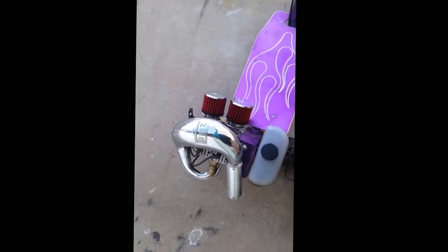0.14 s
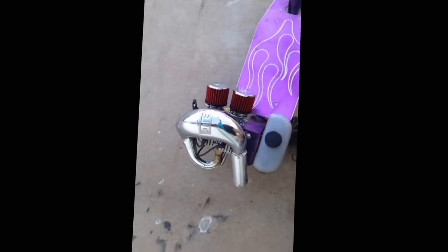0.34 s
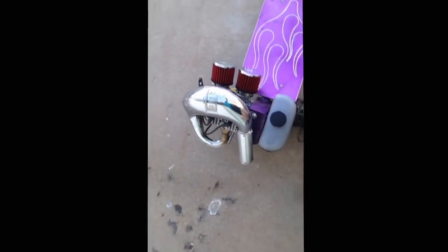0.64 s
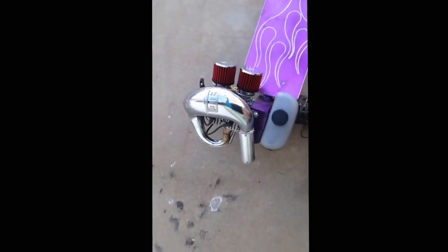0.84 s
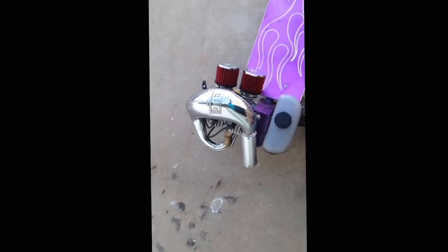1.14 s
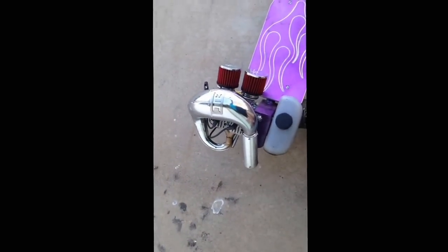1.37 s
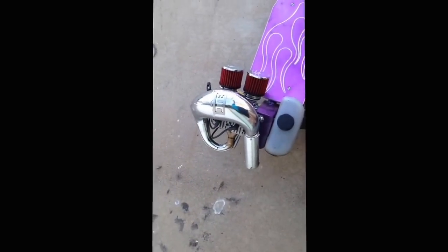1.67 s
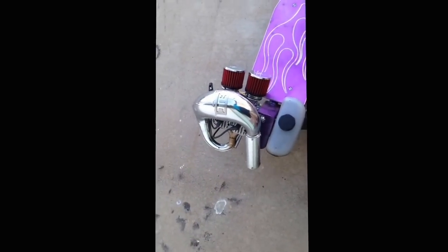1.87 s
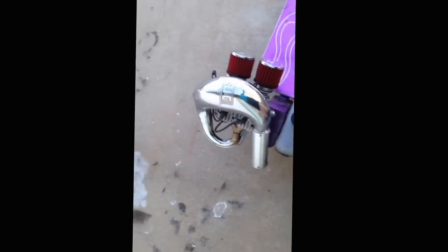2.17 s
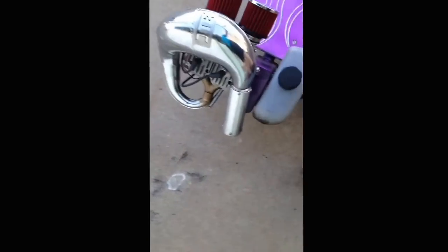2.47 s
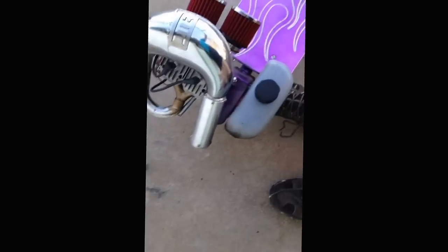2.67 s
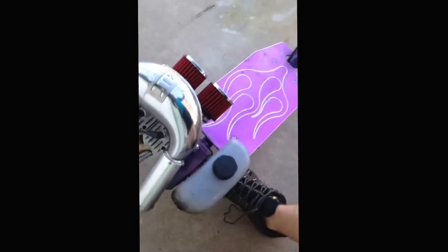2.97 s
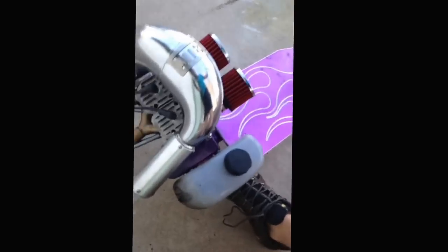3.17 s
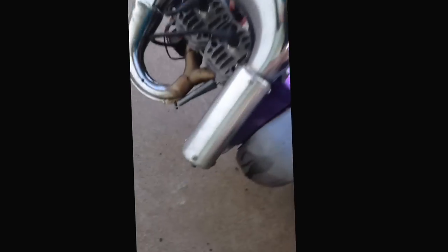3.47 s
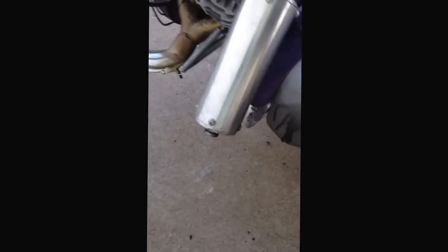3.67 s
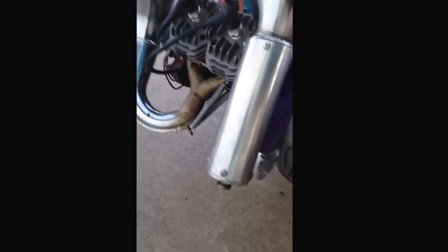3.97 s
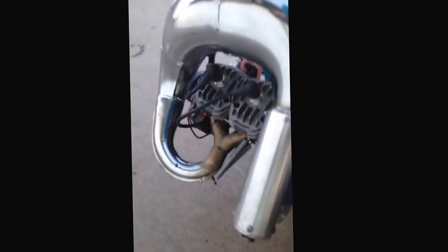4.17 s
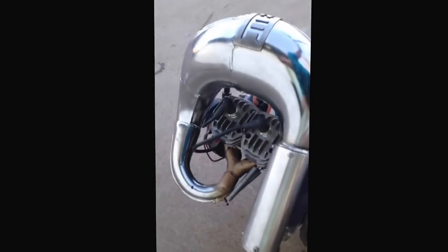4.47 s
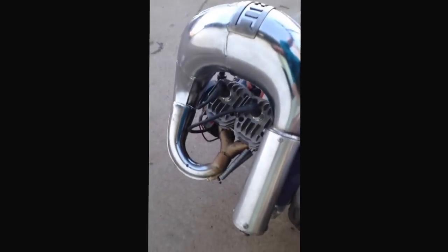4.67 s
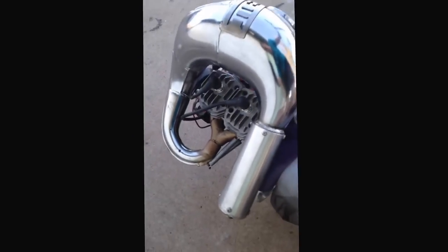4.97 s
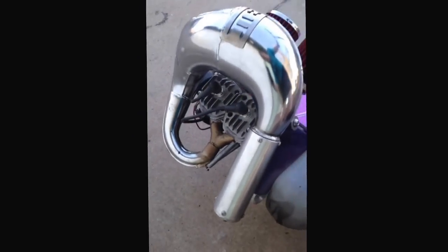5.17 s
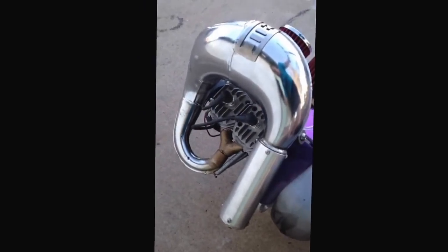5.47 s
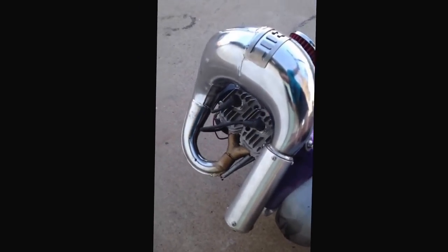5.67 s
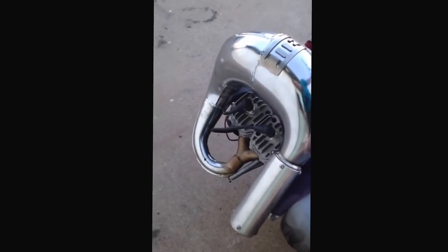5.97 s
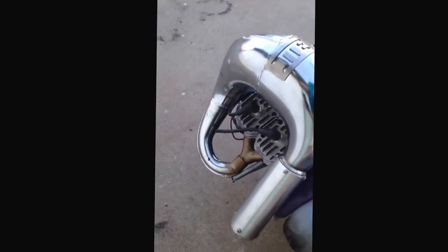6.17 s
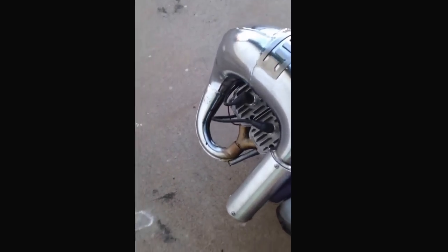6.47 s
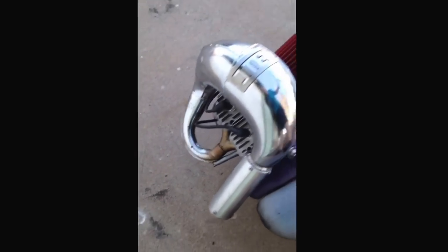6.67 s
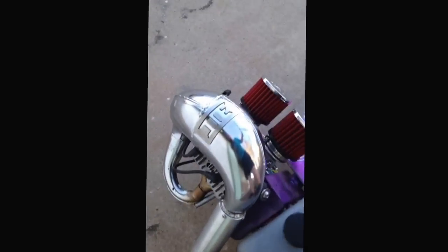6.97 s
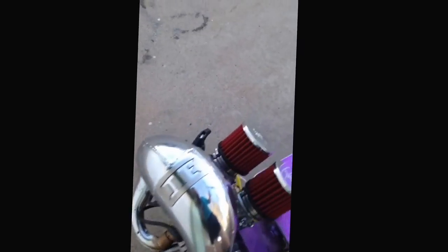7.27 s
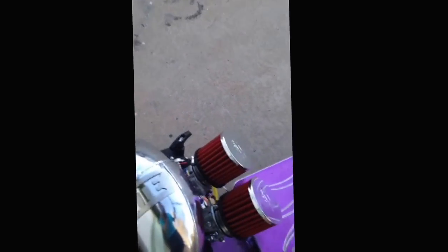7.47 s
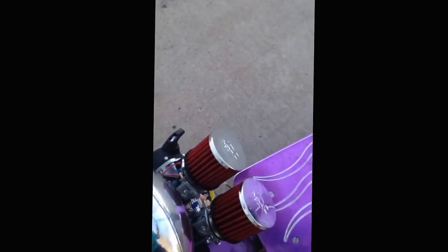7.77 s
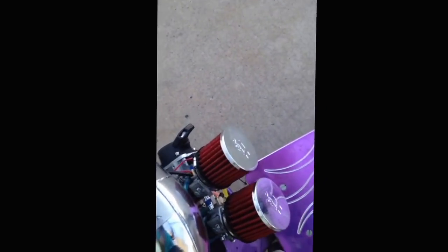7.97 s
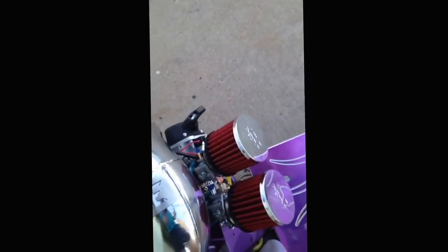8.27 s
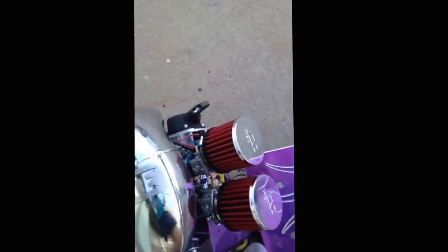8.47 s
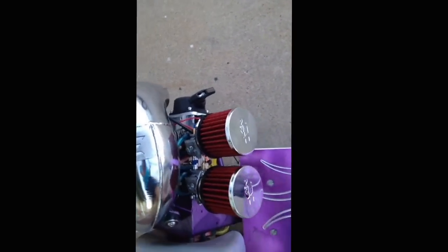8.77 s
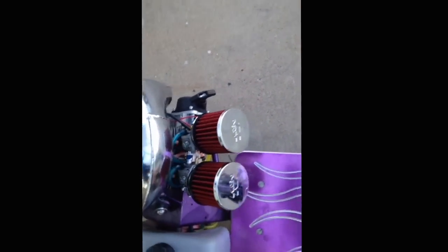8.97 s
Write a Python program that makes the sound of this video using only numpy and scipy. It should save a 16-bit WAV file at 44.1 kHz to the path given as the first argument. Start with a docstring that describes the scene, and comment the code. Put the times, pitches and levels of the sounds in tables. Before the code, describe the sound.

Five quick throttle bursts from a tiny twin-cylinder two-stroke give way to an uneven, popping, clattering idle heard closer and closer, with faint wind.

```python
"""A small two-cylinder two-stroke engine first coasts down from an earlier throttle blip. Five blips follow in
the next three and a half seconds, each a fast run-up and a slower fall. Then it idles lumpily while the
microphone moves in close. Each firing hums in the tuned pipe, barks in the intakes and rattles the casing and
fins; at idle there are added pops every other turn. All of these are pulses and noise sent through resonances.
Filtered noise makes a little wind throughout, and the one microphone clips softly on the loudest peaks."""
import sys
import numpy as np
from scipy.fft import rfft, irfft, next_fast_len
from scipy.io import wavfile
from scipy.ndimage import uniform_filter1d, map_coordinates

SR = 44100
rng = np.random.default_rng(int(sys.argv[2]) if len(sys.argv) > 2 else 0)


def to_wav(s):
    """Save 16-bit WAV."""
    ch = np.atleast_2d(s).T  # columns
    pcm = np.round(np.clip(ch, -1, 1) * 32767)  # PCM
    wavfile.write(sys.argv[1], SR, pcm.astype(np.int16))


N = 402191  # length in samples


def amp(db):
    """Decibels turned into a plain multiplying factor."""
    return 10 ** (np.asarray(db) / 20)


def seconds():
    """The time of every sample, in s."""
    return np.arange(N) / SR


def curves(rows):
    """One value per sample for each column after the time."""
    times, *columns = np.transpose(rows)
    return [np.interp(seconds(), times, column) for column in columns]


def ramp(x, start, end):
    """A straight climb: 0 up to start, 1 from end onwards."""
    return np.clip((x - start) / (end - start), 0, 1)


def wobble(rate):
    """A smooth random curve with the given number of random points a second."""
    points = rng.standard_normal(int(N * rate / SR) + 4)
    return map_coordinates(points, [np.arange(N) * rate / SR])


def even(x, span_s=0.055):
    """x held at a running rms of about 1, so that a loudness curve alone sets its level."""
    size = int(span_s * SR)
    power = uniform_filter1d(uniform_filter1d(x * x, size), size)
    return x / np.sqrt(np.abs(power) + 1e-12)


def filtered(x, response):
    """x with every frequency scaled and shifted in phase by a complex response."""
    m = next_fast_len(N + SR // 4)  # spare room for the tails
    return irfft(rfft(x, m) * response(np.fft.rfftfreq(m, 1 / SR)), m)[..., :N]


def modes(table, turn=-1):
    """A sum of resonances, each ringing after it is struck; turn -1 keeps the valleys between them filled."""
    def response(f):
        total = 0
        for k, (center, width, db) in enumerate(table):
            resonance = 1j * f * width / (center * center - f * f + 1j * f * width)
            total = total + turn ** k * amp(db) * resonance
        return total
    return response


def ringing(spectrum, table):
    """A broad colour with narrow resonances standing on it."""
    hz, db = np.transpose(spectrum)

    def response(f):
        broad = amp(np.interp(np.log(f + 1), np.log(hz), db))
        return broad * (1 + modes(table, turn=1)(f))
    return response


def steepened(table, corner_hz, order):
    """Resonances with the bass below the corner taken away."""
    return lambda f: modes(table)(f) * (1j * f / (corner_hz + 1j * f)) ** order


def between(x, first, second, share):
    """x through two bodies, cross-faded as the microphone moves (share 0 is the first)."""
    share = np.clip(share, 0, 1)
    one, two = filtered(x, lambda f: np.array([first(f), second(f)]))
    return even((1 - share) * even(one) + share * even(two))


def dying(x, t_s):
    """Every pulse of x grows an exponential tail."""
    return filtered(x, lambda f: 1 / (1 + 2j * np.pi * f * t_s))


def breathy(train, puff_s, steady, share):
    """Pulses mixed with noise that puffs after each pulse, over a steady part; share is that of the noise."""
    gate = even(dying(train, puff_s)) + steady
    share = np.clip(share, 0, 1)
    noise = even(gate * rng.standard_normal(N))
    return np.sqrt(1 - share) * even(train) + np.sqrt(share) * noise


def strokes(speed):
    """The running count of firings, two a turn."""
    return 2 * np.cumsum(speed) / SR


def pulses(angle, size, jitter_s):
    """One pulse of the given size near each whole number of the angle, placed between samples."""
    at = np.interp(np.arange(len(size)) + 1, angle, np.arange(N))
    at = np.clip(at + jitter_s * SR * rng.standard_normal(len(size)), 0, N - 2)
    whole, part = at.astype(int), at % 1
    return np.bincount(whole, size * (1 - part), N) + np.bincount(whole + 1, size * part, N)


def firings(speed, weak, lead, scatter_db, jitter_s):
    """Two pulses a turn, lead strokes ahead of the exhaust blow; the second cylinder is weaker."""
    angle = strokes(speed) + lead
    count = np.arange(1, int(angle[-1]))
    weak = np.clip(np.interp(count, angle, weak), 0, 1)
    size = (1 - weak * (count % 2)) * amp(scatter_db * rng.standard_normal(len(count)))
    return pulses(angle, size, jitter_s)


# Wind rumble before lumps, gusts and a 4 dB cut: (t/s, level/dB)
WIND_RUMBLE = [(0, -53), (.3, -39), (1.5, -36), (2.2, -42.5), (3.4, -37), (4.1, -38), (5.5, -36), (7, -37),
               (8.2, -36.5), (9.12, -42)]
# Short gusts: (t/s, level/dB above the rumble)
WIND_GUSTS = [(2.62, 17), (7.39, 13), (8.26, 17)]


def wind(speed):
    """Air buffets the microphone: low noise in slow lumps and gusts, thinning out as the engine revs up."""
    def low(f):
        return modes([(68, 50, 0)])(f) * f * f / (f * f + 3000) / (1 + (f / 110) ** 4)
    rumble = filtered(rng.standard_normal(N), low)
    gust_width_s, lump_db, lumps_per_s, thins_db = .035, 3.5, 7, -34
    t = seconds()
    gust_db = sum(db * np.exp(-((t - s) / gust_width_s) ** 2) for s, db in WIND_GUSTS)
    level_db = curves(WIND_RUMBLE)[0] - 4 + gust_db + lump_db * wobble(lumps_per_s)
    level_db = level_db + thins_db * ramp(speed, 68, 220)  # turns per second
    return amp(level_db) * rumble / np.std(rumble)


# Idle speed before random hunting: (t/s, f/Hz as turns per second)
IDLE_SPEED = [(0, 54.1), (.45, 54.92), (2.14, 57.37), (2.27, 61.8), (2.5, 52.43), (2.6, 52.32), (3.2, 62.7),
              (3.4, 58.83), (4.06, 67.01), (4.26, 54.2), (4.6, 57.8), (4.72, 62.94), (5.05, 65.54),
              (5.41, 67.35), (5.77, 62.9), (6.21, 65.97), (6.49, 62.54), (6.77, 65.73), (7.15, 64),
              (7.28, 68.92), (7.69, 64.14), (8.0, 64.94), (8.27, 59.26), (8.66, 56.08), (9.0, 56.96),
              (9.12, 59.7)]
# Throttle blips: (opens t/s, opening time/s, shuts t/s, middle of the run-up t/s, run-up time/s,
# speed starts to fall t/s, speed aimed at f/Hz before the creep, coasting loss per s;
# changes while pulling: pipe level/dB, intake level/dB, casing level/dB, fins level/dB;
# changes while coasting: gas level/dB, metal level/dB)
THROTTLE_BLIPS = [(.44, .06, .575, .557, .0283, .603, 287, 3.17, -2, 0, 0, 0, 0, 0),
                  (.912, .028, 1.072, .973, .0183, 1.093, 274, 3.33, 0, 0, 0, 0, 0, 0),
                  (1.462, .028, 1.618, 1.529, .0172, 1.632, 277, 3.14, 0, 0, 0, 0, 0, 0),
                  (2.592, .04, 2.748, 2.698, .0238, 2.755, 262, 3.05, 1, 2, -4, -1, 0, 0),
                  (3.368, .028, 3.538, 3.463, .0248, 3.544, 284, 3.13, -3, 3, -9, -2, -1, 1.5)]
START_HZ, START_LOSS = 149, 3.05  # still coasting down from an earlier blip (turns per second, loss per s)
HUNT_HZ, HUNTS_PER_S = 1.2, 12  # random wander of the idle: size, random points a second
CREEP_HZ_PER_S = 180  # near the top the speed still creeps up


def shaft():
    """Crankshaft speed in turns per second: an S-shaped run-up at each blip, then an exponential fall to idle."""
    t = seconds()
    idle = curves(IDLE_SPEED)[0] + HUNT_HZ * wobble(HUNTS_PER_S)
    speed = np.maximum(idle, START_HZ * np.exp(-START_LOSS * t))
    for _, _, _, middle, rise_s, falls, aim_hz, loss, *_ in THROTTLE_BLIPS:
        climb = (1 + np.tanh((t - middle) / rise_s / 2)) / 2
        target = aim_hz + CREEP_HZ_PER_S * (t - middle)
        rising = speed + (target - speed) * climb
        falling = rising[int(falls * SR)] * np.exp(-loss * np.abs(t - falls))
        speed = np.where(t < falls, rising, np.maximum(idle, falling))
    return uniform_filter1d(speed, SR // 60)


# Throttle open, before each blip's own changes: (speed f/Hz as turns per second, pipe level/dB,
# intake level/dB, casing level/dB, fins level/dB, weakness of the second cylinder in the pipe 0-1,
# the same in the intakes 0-1, pressure swell relative to the blow's own first tone)
PULLING_LEVELS = [(60, -18, -14.5, -23, -28, .3, 0, 1.9), (90, -12.5, -11, -22.5, -23.5, .15, 0, 1.4),
                  (125, -15, -9.5, -17.5, -23.5, 0.3, 0.1, 4),
                  (185, -21.5, -19, -12.5, -15, 0.64, 0.24, 0.95),
                  (229, -11, -14, -11.5, -15, 0.4, .4, 3.9), (268, -8, -20.5, -20, -11.5, 0, 0, 1.4),
                  (294, -14, -11, -12, -16.5, 0.5, 0, 1.8)]
# Throttle shut: same columns; the rattle steps down near 160 Hz, probably as the clutch lets go
COASTING_LEVELS = [(90, -32.5, -36, -34.5, -29.5, 0.62, 0.3, 0.23),
                   (113.5, -34, -38, -34, -28, 0.55, 0.45, 0.27),
                   (133, -30.5, -33.5, -33, -23.5, 1, 0.25, 2.1), (164, -34, -28, -28.5, -23, 1, 0.27, 2.9),
                   (181.4, -38, -34.5, -23.5, -12.5, 0.76, 1, 0.89),
                   (171, -43.5, -28.5, -19.5, -15, .55, 0.96, 1.3),
                   (203.4, -18.5, -32, -29, -14.5, .55, 0.53, 1.3),
                   (221, -28, -26, -22.5, -13.5, 0.38, 0.29, 2.3),
                   (269, -22.5, -39, -24, -15, 0.82, 0.99, 1.3),
                   (282, -23.5, -29.5, -19.5, -10.5, 1, .3, 1.3)]
# Idling, louder as the microphone comes near: (t/s, then the same columns after the speed)
IDLING_LEVELS = [(0, -31, -35.5, -36.5, -30.5, 0.97, .25, 0.11),
                 (2.1, -32.5, -38.5, -37, -30.5, 0.67, 0.49, 0.11),
                 (2.58, -32, -36.5, -35.5, -28, 0.45, .55, 0.43),
                 (3.15, -32.5, -34.5, -38, -28, 0.73, 0.94, 0.2),
                 (3.36, -30.5, -30.5, -35, -25.5, 0.68, .79, 0.46),
                 (4.0, -27.5, -31.5, -32.5, -25.5, 0.55, 0.66, 0.18),
                 (4.35, -31, -31.3, -33, -25.5, .6, 0.47, 0.34),
                 (4.72, -26.5, -27.3, -28.5, -21, 0.3, 0.51, 0.26),
                 (5.02, -25, -27.5, -28.5, -20, 0.75, 0.89, 0.16),
                 (5.42, -25.5, -27.5, -27, -20, .5, 0.7, .3),
                 (6.0, -24, -25.5, -26, -19.7, 0.77, 0.74, 0.25),
                 (6.95, -22.5, -27, -25, -20, 0.53, 0.54, .28),
                 (7.84, -20.5, -27, -21.5, -19, .5, .46, .26),
                 (8.16, -21, -26, -23, -18.5, 0.71, 0.27, 0.24),
                 (8.49, -25.5, -27.5, -20.5, -19.1, 0.49, 0.5, .27),
                 (9.12, -25, -27.5, -22, -21, 0.55, 0.29, 0.16)]
CLOSING_S = .032  # throttle travel back
SETTLED_HZ, UNSETTLED_HZ = 68, 103  # coasting blends into idle between these speeds
RAGGED_DB, RAGGED_PER_S = 2.5, 30  # uneven levels on the overrun: depth, random points a second
# turbulence: strongest as the throttle snaps open at low speed, least once past SMOOTHS_HZ
ROUGH_SHUT, ROUGH_OPEN, ROUGH_SNAP, SMOOTHS_HZ = .125, .085, .22, 170


def at_speed(rows, speed):
    """Each column after the first, read off at the engine speed."""
    hz, *columns = np.transpose(rows)
    return np.array([np.interp(speed, hz, column) for column in columns])


def running(speed):
    """Throttle and speed set the four part levels, cylinder weakness, swell, turbulence and share of revving."""
    t = seconds()
    throttle, extra_db = np.zeros(N), np.zeros((4, N))
    for opens, opening_s, shuts, *_, pipe_db, intake_db, casing_db, fins_db, gas_db, metal_db in THROTTLE_BLIPS:
        opened = ramp(t, opens, opens + opening_s)
        opened = opened - ramp(t, shuts - CLOSING_S / 2, shuts + CLOSING_S / 2)
        throttle = throttle + opened
        pulling_db = np.array([[pipe_db], [intake_db], [casing_db], [fins_db]])
        coasting_db = np.array([[gas_db], [gas_db], [metal_db], [metal_db]])
        after = t > opens  # holds until the next blip replaces it
        extra_db[:, after] = (opened * pulling_db + (1 - opened) * coasting_db)[:, after]
    revving = np.maximum(throttle, ramp(speed, SETTLED_HZ, UNSETTLED_HZ))
    coasting = revving - throttle
    state = throttle * at_speed(PULLING_LEVELS, speed) + coasting * at_speed(COASTING_LEVELS, speed)
    state = state + (1 - revving) * np.array(curves(IDLING_LEVELS))
    state[:4] += revving * extra_db
    # pipe, intake and casing waver separately
    state[:3] += coasting * RAGGED_DB * np.array([wobble(RAGGED_PER_S) for part in range(3)])
    pulling_rough = ROUGH_SNAP + (ROUGH_OPEN - ROUGH_SNAP) * ramp(speed, 83, SMOOTHS_HZ)
    rough = ROUGH_SHUT + throttle * (pulling_rough - ROUGH_SHUT)
    return state, rough, revving


# At idle the charge lights only every other turn, in spells; level before the cut while revving:
# (start t/s, end t/s, pop level/dB)
POP_SPELLS = [(.19, .46, -41), (2.065, 2.337, -36), (3.117, 3.38, -33.5), (3.954, 4.178, -28.5),
              (4.657, 5.82, -25.5), (6.043, 7.007, -25.5), (7.165, 8.244, -24.5), (8.24, 9.199, -35)]
SPELL_EDGE_S, BETWEEN_DB = .068, -37.5  # fade time of a spell, pop level between spells


def spells(revving):
    """Loudness in dB of the every-other-turn pops, 14 dB lower while revving."""
    t = seconds()
    half = SPELL_EDGE_S / 2
    lift_db = 0
    for start, end, db in POP_SPELLS:
        lit = ramp(t, start - half, start + half) - ramp(t, end - half, end + half)
        lift_db = lift_db + (db - BETWEEN_DB) * lit
    return BETWEEN_DB + lift_db - 14 * revving


def popping(speed, lead):
    """One pulse of slightly random size every two turns, lead strokes early."""
    angle = (strokes(speed) + lead) / 4  # four strokes make two turns
    size = amp(1.3 * rng.standard_normal(int(angle[-1]) - 1))
    return pulses(angle, size, jitter_s=.0004)


# Where the microphone is: (t/s, share of the upper intake tone 0-1, share of the intake side 0-1)
MIC_PLACE = [(0, 0.24, 0.5), (.55, 0.31, 0.64), (1, 0.51, 0.61), (1.55, 0.51, 0.52), (2, 0.23, 0.45),
             (2.55, 0.21, 0.48), (2.63, 0.85, 0.84), (3, 0.45, 0.32), (3.4, 0.72, 0.48), (3.9, 0.6, 0.24),
             (4.3, 0.43, 0.28), (5, 0.57, 0.09), (6, 0.46, 0.14), (7, 0.13, 0.03), (8.1, 0.25, 0.18),
             (8.4, .2, 0.82), (9.12, 0.1, 0.47)]


def mic_place():
    """The share of the upper intake tone and the share of the intake side, sample by sample."""
    return curves(MIC_PLACE)


# The intake's cough: (f/Hz, width f/Hz, relative level/dB)
COUGH_MODES = [(920, 340, 0), (1800, 170, -7)]


def coughing(speed, pop_db):
    """The intake coughs 1.4 strokes after a pop, as loud as the pop times the share of the upper tone."""
    upper = np.clip(mic_place()[0], 0, 1)
    puffs = popping(speed, lead=2.6)
    return amp(pop_db) * upper * even(filtered(puffs, modes(COUGH_MODES)))


# Resonances rung by a pop: (f/Hz, width f/Hz, relative level/dB)
CHAMBER_MODES = [(179, 120, 3), (286.4, 72, 10), (874, 29, -7), (1050, 180, -53), (1660, 130, -22.5)]
# A pop heard from the intake side: same columns
CHAMBER_MODES_FAR = [(272, 87, -10), (454, 1800, 7), (714, 25, -10)]


def chamber(pops, pop_db):
    """Each pop of burning charge rings the chamber's low resonances."""
    side = mic_place()[1]
    return amp(pop_db) * between(pops, modes(CHAMBER_MODES), modes(CHAMBER_MODES_FAR), side)


# Casing resonances: (f/Hz, width f/Hz, relative level/dB)
CASING_MODES = [(1390, 780, -6), (1560, 680, 3), (2152, 100, 4), (2420, 160, 1)]
# The casing heard from the intake side: same columns
CASING_MODES_FAR = [(1230, 820, 2.5), (1497, 560, 4.5), (2043, 107, 9), (2500, 210, 2.5)]
# Broad colour of the rattle close by: (f/Hz, relative level/dB per Hz)
RATTLE_COLOUR = [(1530, -14), (2600, -11), (3100, -1), (3770, -3.5), (4290, 1.5), (5350, 3.5), (8820, -0.5),
                 (11900, -7), (13100, -8), (14000, -9), (15100, -8), (15600, -21), (15900, -35)]
# The rattle heard from afar: same columns
RATTLE_COLOUR_FAR = [(1530, -37), (2600, 0), (2890, -7), (3690, 2), (4770, -2.5), (5430, -3), (10700, -4),
                     (15000, -11.5), (15600, -19), (15900, -38)]
# Ringing of the cooling fins: (f/Hz, width f/Hz, level/dB above the rattle)
FIN_MODES = [(3680, 19, 11.5), (3873, 48, 9), (5510, 28, 7.5), (5940, 13, 9), (6660, 14, 5),
             (6770, 77, 2.5), (7280, 250, 3), (9420, 82, 11.5), (10620, 54, 15), (11200, 63, 13),
             (10600, 23, -20), (11690, 54, 13.5), (11830, 52, 18), (12800, 40, 4), (13600, 80, -0.5)]
# Ringing of the cooling fins, heard from afar: same columns
FIN_MODES_FAR = [(3744, 135, 0.5), (5400, 230, 2), (6080, 19, 9), (6710, 30, 7), (7280, 160, -7),
                 (10040, 39, 11)]
# How near the fins the microphone is: (t/s, nearness 0-1)
FIN_NEARNESS = [(0, 0), (2.2, 0.1), (3, 0), (3.8, 0.37), (4.4, 0.8), (5.5, 0.9), (7, 0.62), (8, 0.78),
                (9.12, 0.64)]


def metal(speed, rough, casing_db, fins_db, pops, pop_db):
    """Piston slap shakes the casing and rings the fins, mostly as noise that flares at each stroke and pop."""
    side = mic_place()[1]
    slaps = firings(speed, .45 + .3 * side, lead=.45, scatter_db=1.5, jitter_s=.00002)
    slaps = slaps + 1.3 * pops * np.clip(amp(pop_db - fins_db + 5), 0, 1)
    knock_noise = 1.03 - .15 * side - speed / 290 + rough / 2
    knocks = breathy(slaps, puff_s=.003, steady=.9, share=knock_noise)
    casing = between(knocks, steepened(CASING_MODES, 1100, 2), steepened(CASING_MODES_FAR, 1100, 2), side)
    rattle = breathy(slaps, puff_s=.0045, steady=1.2, share=1 - (speed / 800) ** 2)
    far, near = ringing(RATTLE_COLOUR_FAR, FIN_MODES_FAR), ringing(RATTLE_COLOUR, FIN_MODES)
    fins = between(rattle, far, near, curves(FIN_NEARNESS)[0])
    return amp(casing_db) * casing + amp(fins_db) * fins


# Pipe resonances heard at the outlet: (f/Hz, width f/Hz, relative level/dB)
PIPE_MODES = [(86.6, 5.2, -40), (126, 130, -5.5), (281.7, 33.5, 5.5), (406, 19, -4.5), (537, 54, -17.5)]
# The pipe heard from the intake side: same columns
PIPE_MODES_FAR = [(90, 31, -9), (133, 43, 9.5), (254, 78, 6.5), (364, 106, 10), (566.6, 26, 12)]
# Lower intake tone: (f/Hz, width f/Hz, relative level/dB)
INTAKE_LOW_MODES = [(588, 390, -9), (760, 72, 2), (880, 200, -23.5)]
# Upper intake tone: same columns
INTAKE_HIGH_MODES = [(594, 49, 15), (740, 120, -25), (986, 98, 26), (1330, 550, 4.5)]


def gas(speed, rough, pipe_db, intake_db, pipe_weak, intake_weak, swell):
    """Exhaust blows hum in the pipe, and gulps of air bark in the intakes."""
    upper, side = mic_place()
    blows = firings(speed, pipe_weak, lead=0, scatter_db=.7, jitter_s=.00005)
    blows = breathy(blows, puff_s=.005, steady=.5, share=3300 * rough / speed ** 2)
    # as strong as the first tone of an even pulse train with rms 1
    first_tone = np.sqrt(8 * speed / SR) * np.cos(2 * np.pi * strokes(speed))
    blows = blows + np.clip(swell, 0, 9) * first_tone
    # a short open pipe radiates no deep bass
    pipe = between(blows, steepened(PIPE_MODES, 70, 3), steepened(PIPE_MODES_FAR, 70, 3), side)
    gulps = firings(speed, intake_weak, lead=.6, scatter_db=1.2, jitter_s=.00004)
    gulps = breathy(gulps, puff_s=.003, steady=.8, share=rough * (1 + 190 / speed))
    low, high = steepened(INTAKE_LOW_MODES, 600, 1), steepened(INTAKE_HIGH_MODES, 600, 1)
    intake = between(gulps, low, high, upper)
    return amp(pipe_db) * pipe + amp(intake_db) * intake


def scene():
    """Wind and all engine parts follow one shaft speed and reach one microphone, on both channels."""
    speed = shaft()
    (pipe_db, intake_db, casing_db, fins_db, *flow), rough, revving = running(speed)
    pops, pop_db = popping(speed, lead=0), spells(revving)
    one = wind(speed) + coughing(speed, pop_db) + chamber(pops, pop_db)
    one = one + metal(speed, rough, casing_db, fins_db, pops, pop_db)
    one = one + gas(speed, rough, pipe_db, intake_db, *flow)
    return np.array([one, one])


def record(dry):
    """The input clips softly near full scale and keeps nothing from 15450 Hz up."""
    held = dry / (1 + np.abs(dry / .93) ** 5) ** (1 / 5)
    return filtered(held, lambda f: f < 15450)


dry = scene()
out = record(dry)
to_wav(out)
```